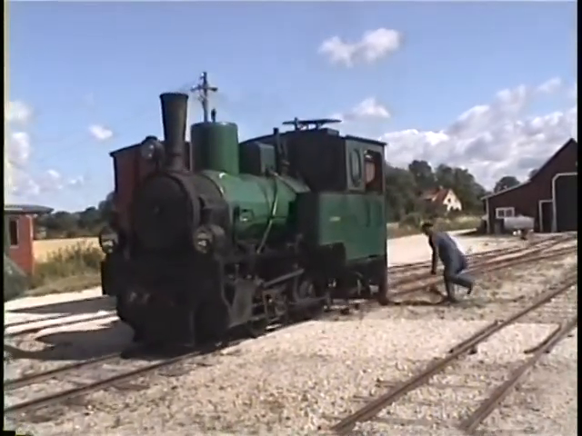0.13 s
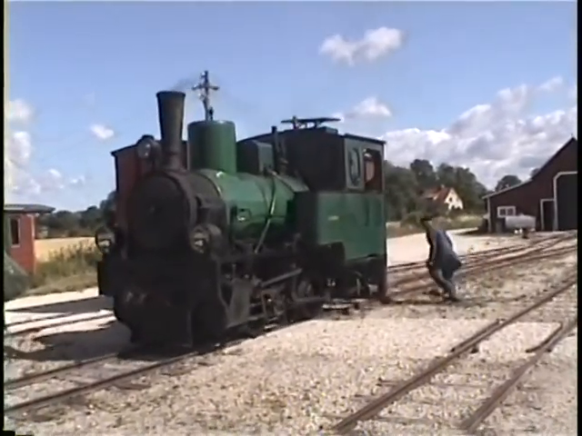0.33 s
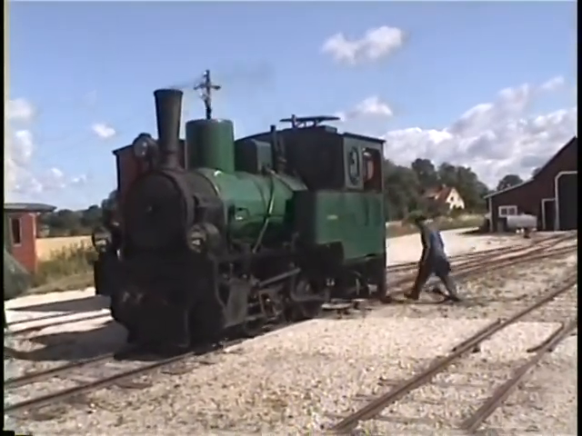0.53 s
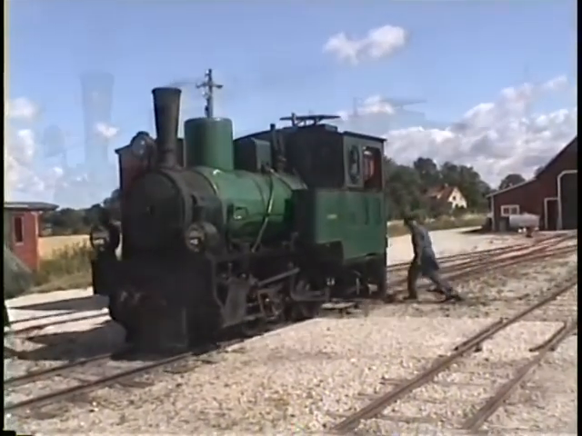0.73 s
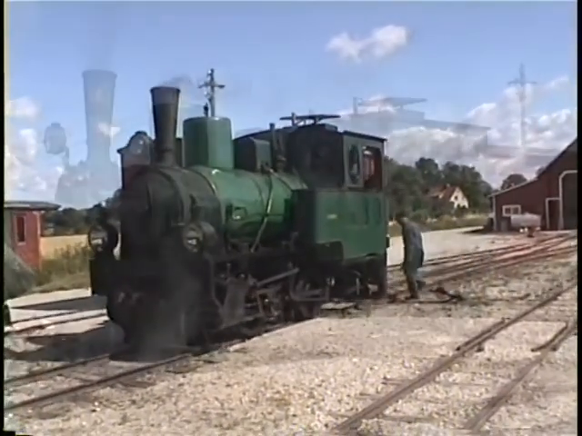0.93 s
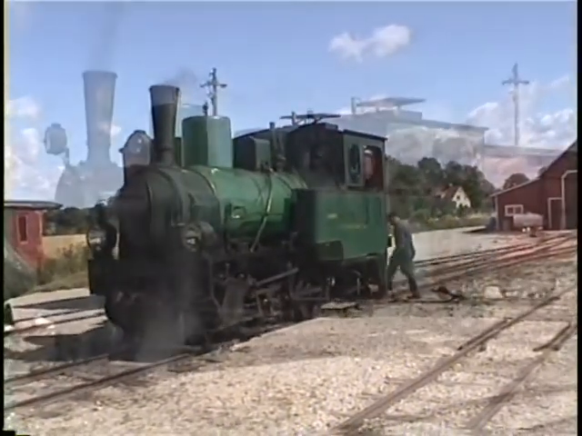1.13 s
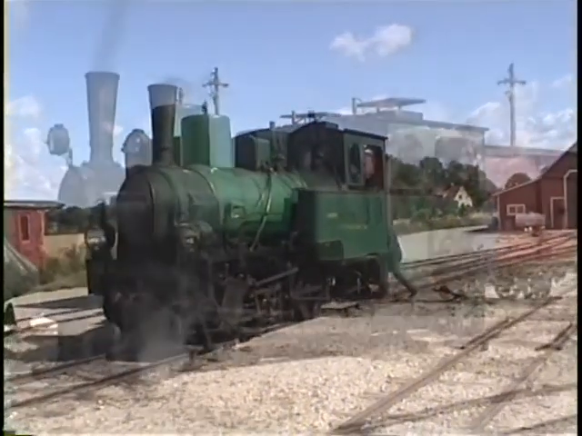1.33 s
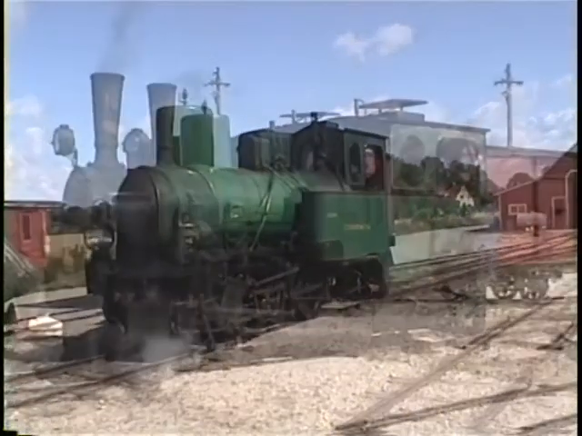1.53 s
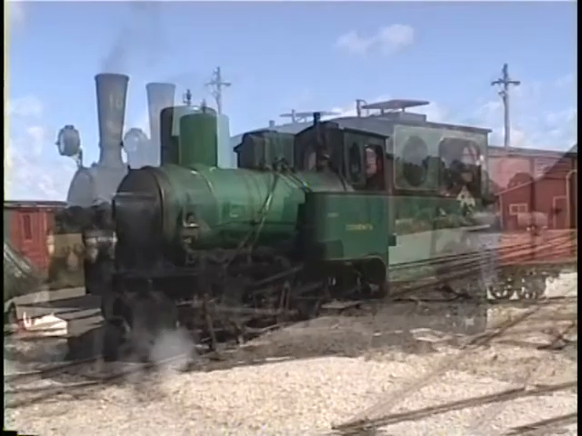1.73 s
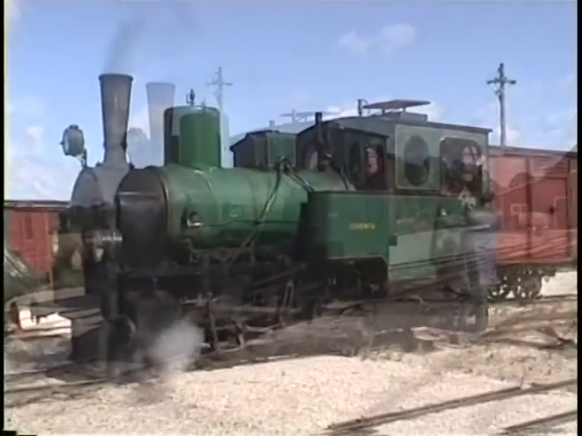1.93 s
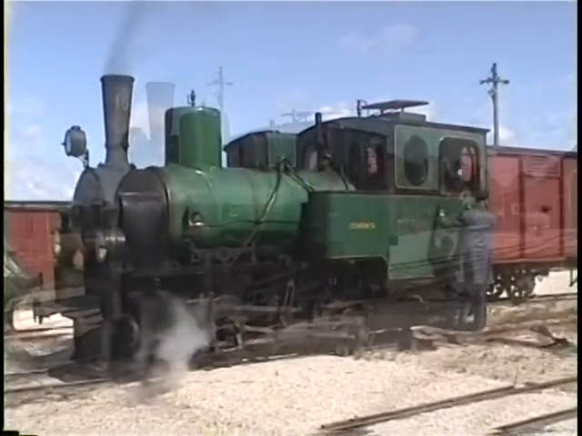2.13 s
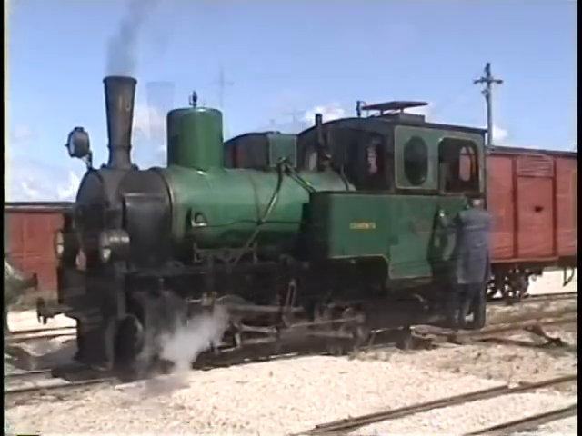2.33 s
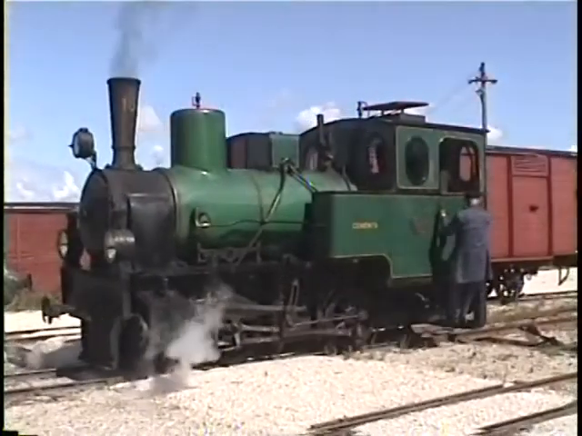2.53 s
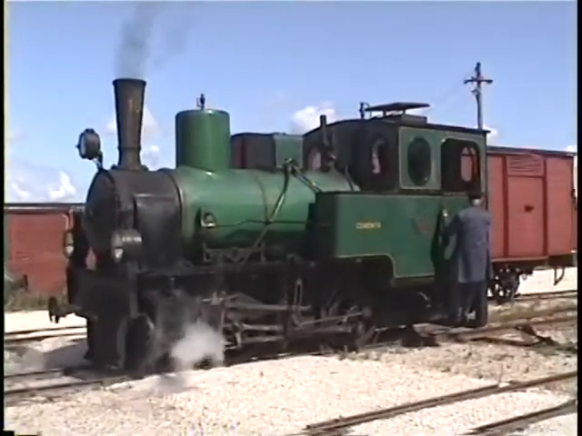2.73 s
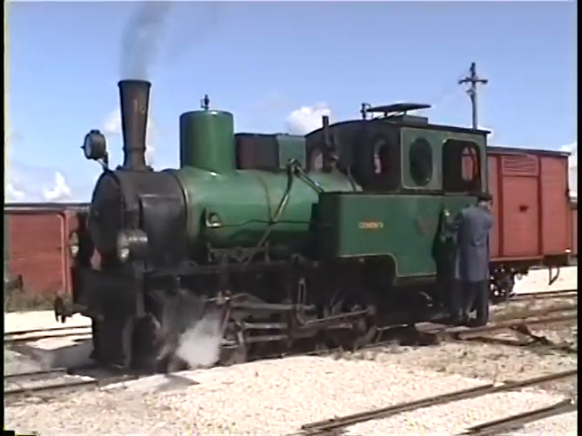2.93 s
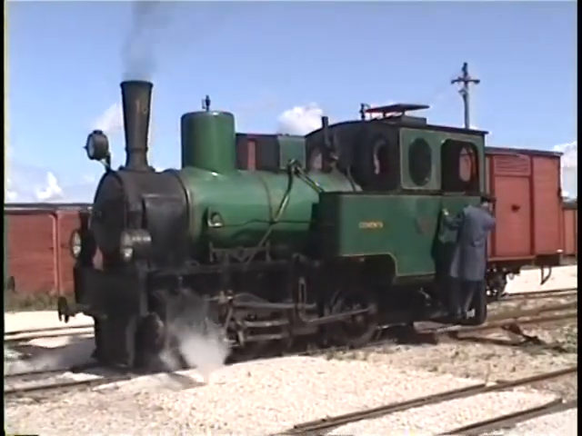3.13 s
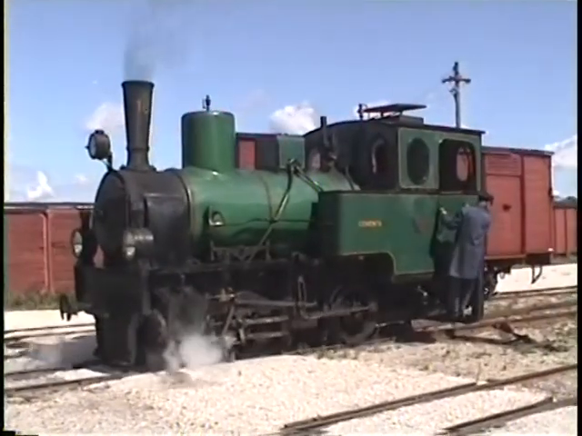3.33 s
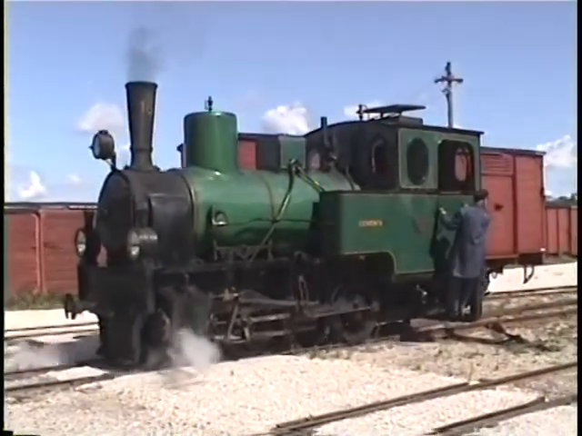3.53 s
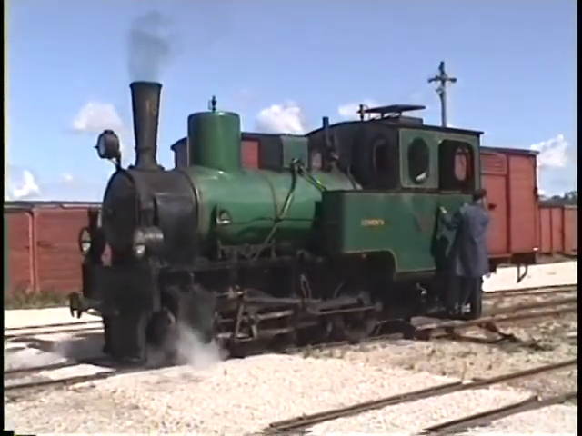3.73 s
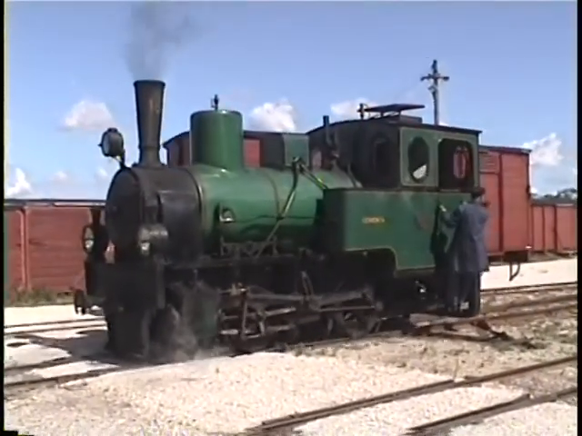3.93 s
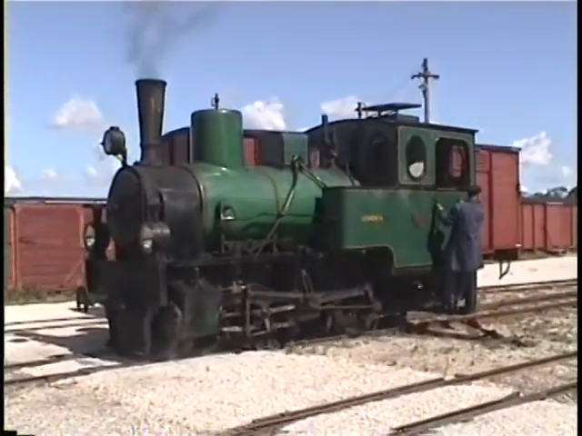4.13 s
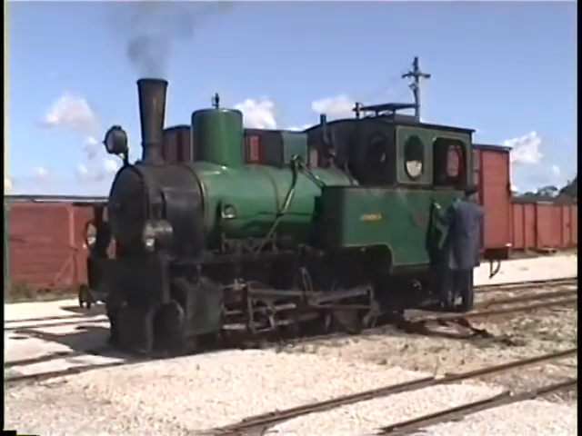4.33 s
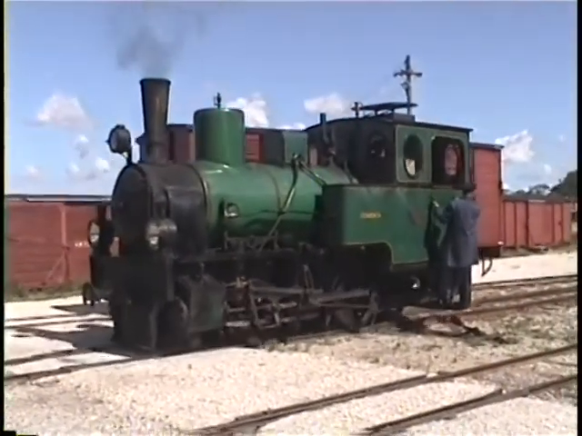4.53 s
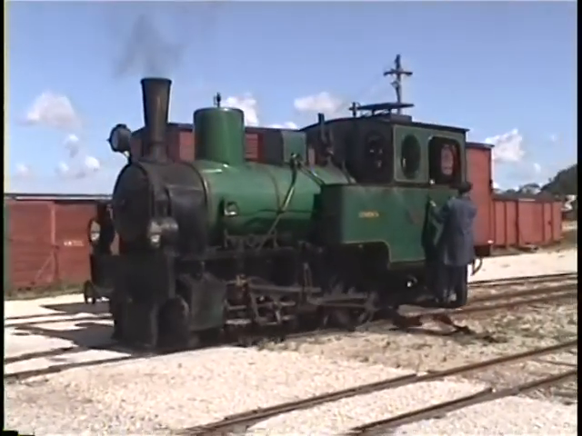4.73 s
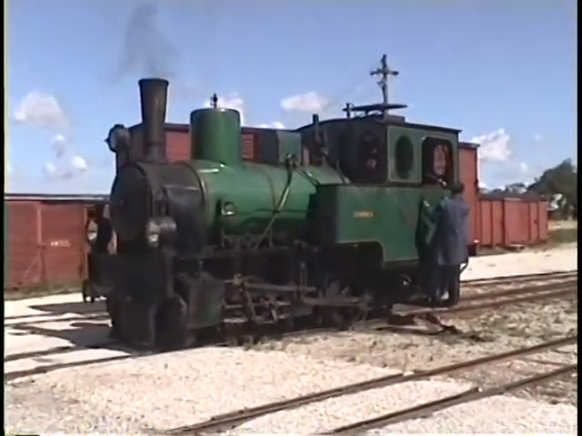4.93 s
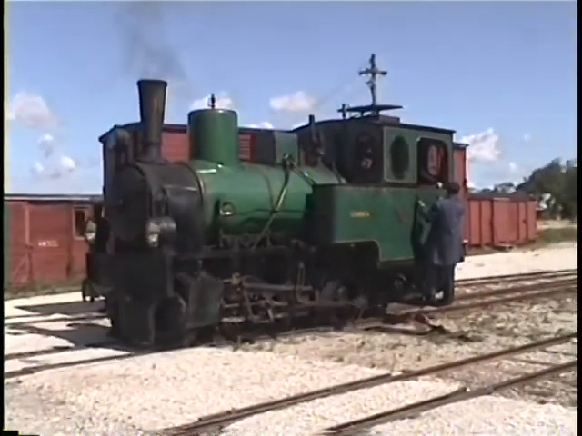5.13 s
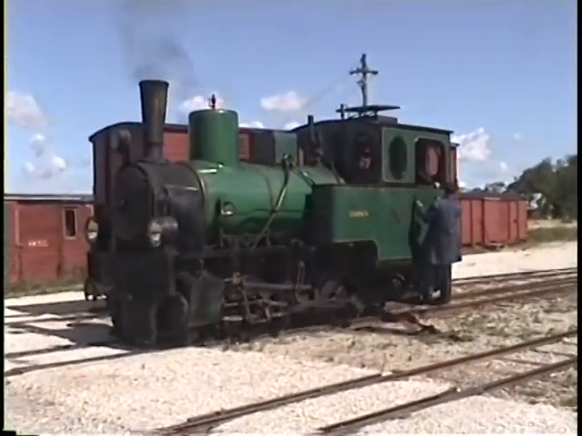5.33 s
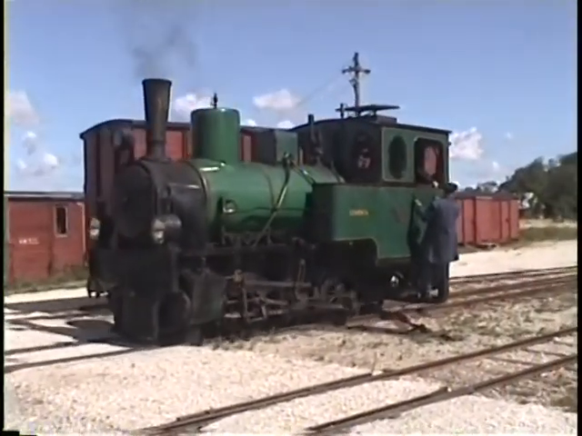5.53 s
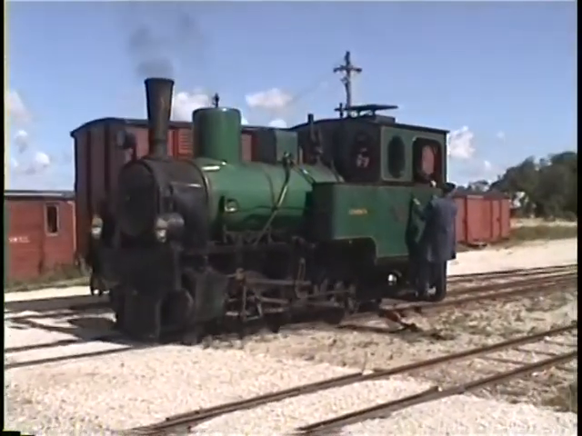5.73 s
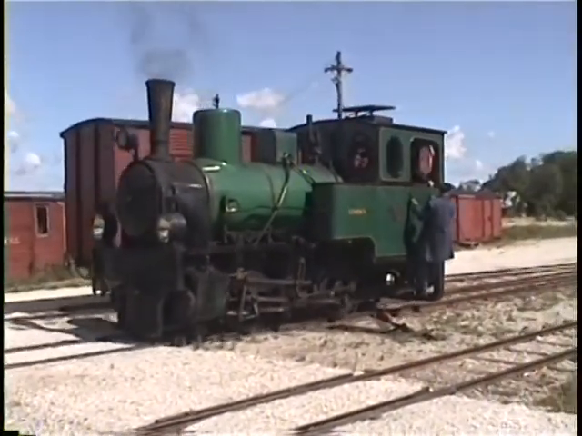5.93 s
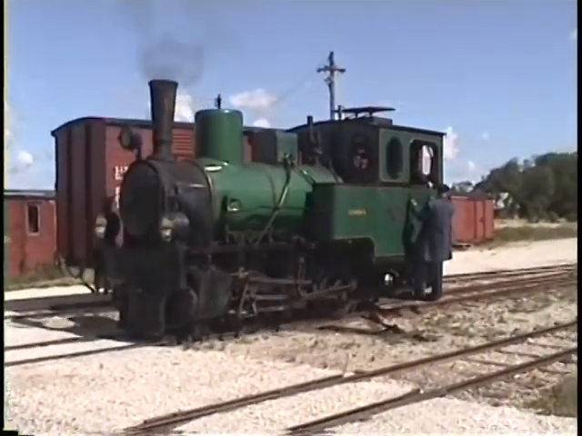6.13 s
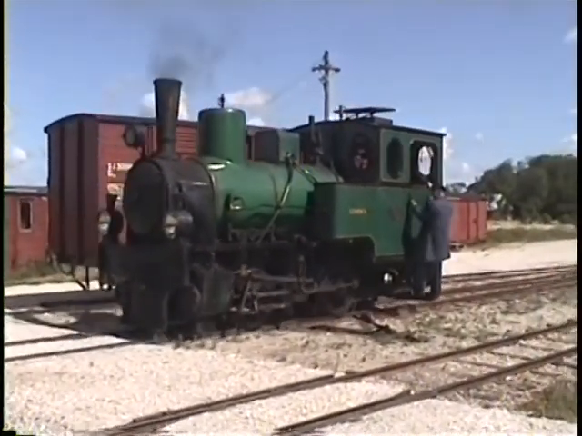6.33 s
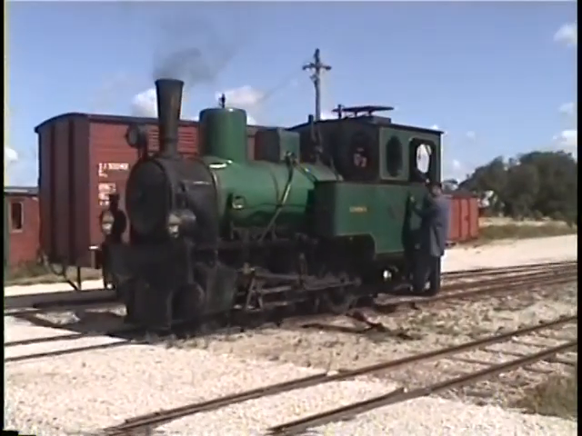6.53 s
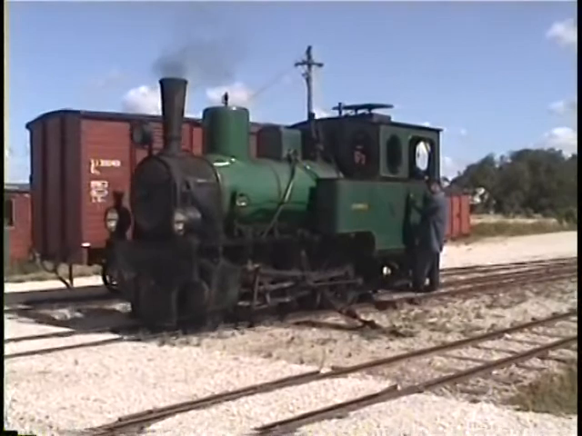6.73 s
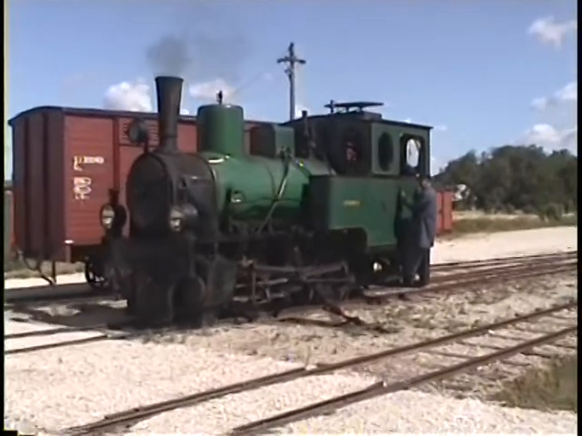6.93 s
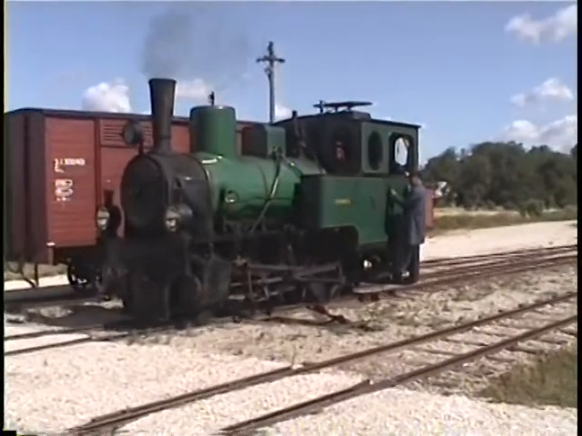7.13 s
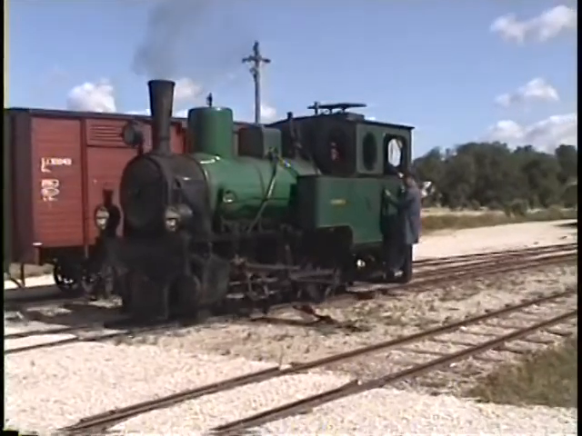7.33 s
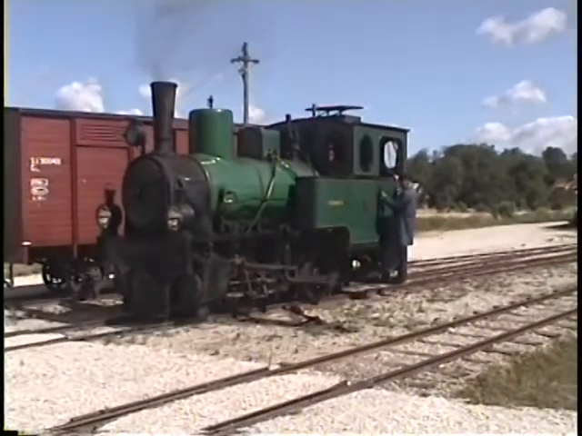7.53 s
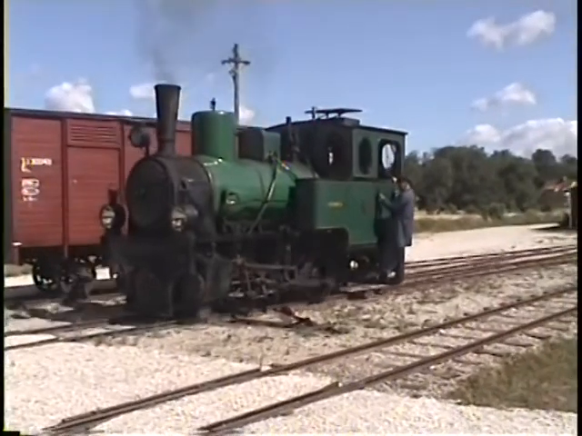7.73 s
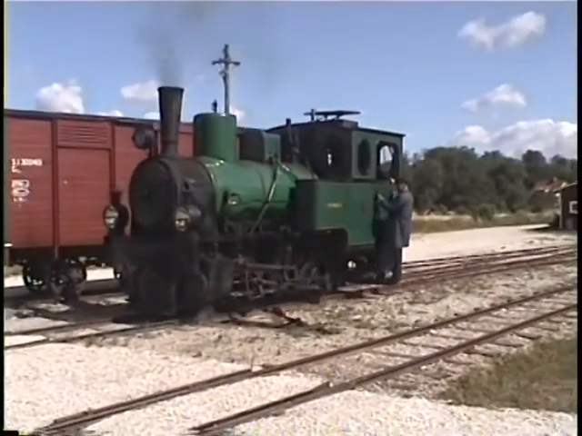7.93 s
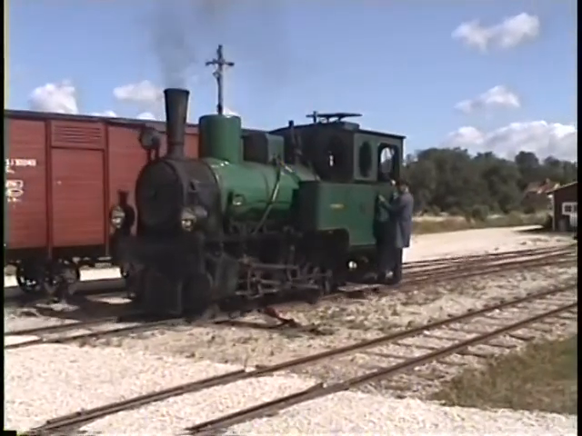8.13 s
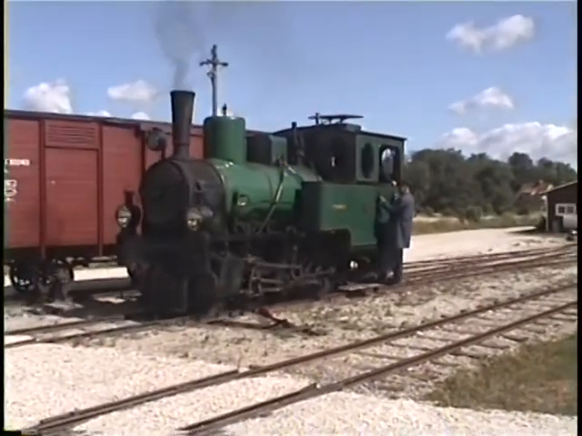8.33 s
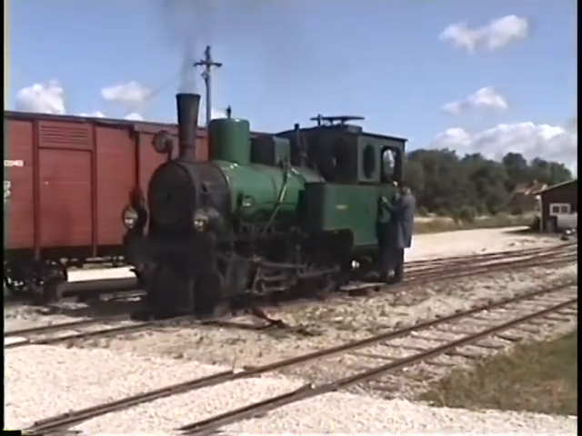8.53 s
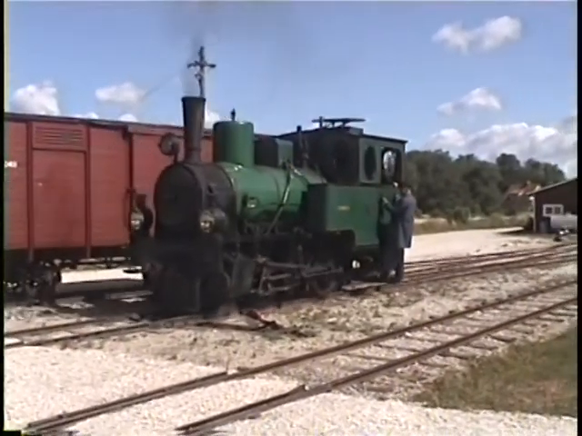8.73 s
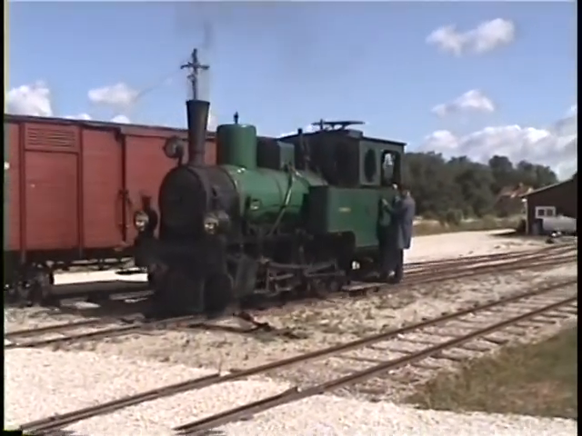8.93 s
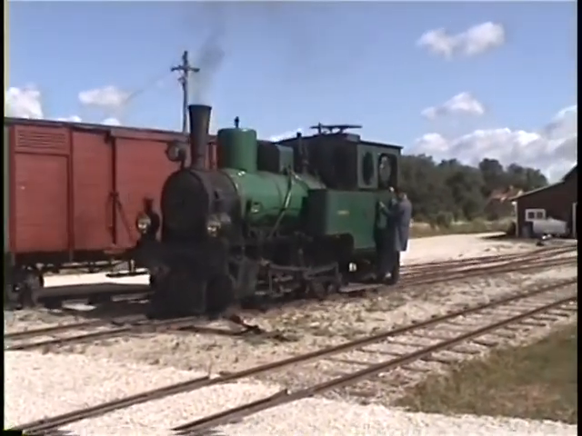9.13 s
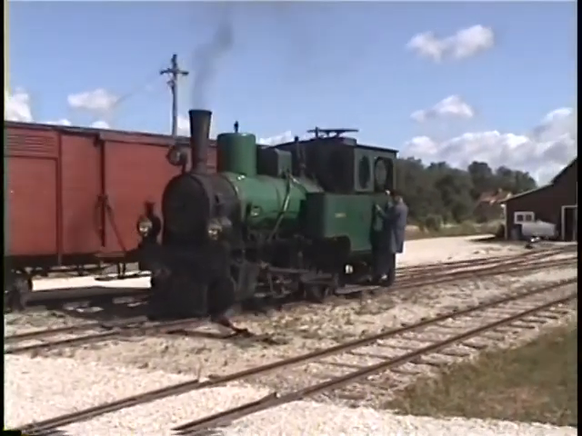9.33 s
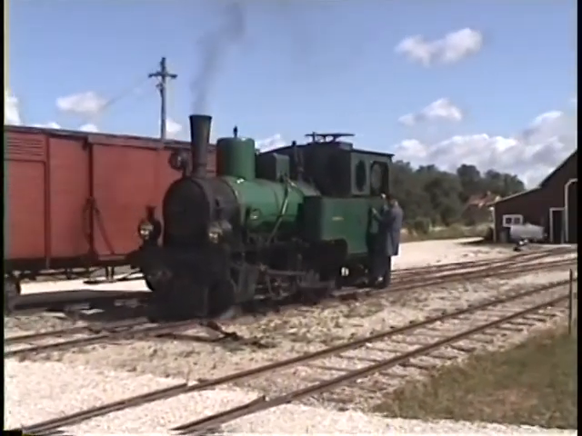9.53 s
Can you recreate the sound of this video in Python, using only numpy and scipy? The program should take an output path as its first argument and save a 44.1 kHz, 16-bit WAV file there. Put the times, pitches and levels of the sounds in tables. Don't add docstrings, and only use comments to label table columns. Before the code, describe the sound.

Open rail yard, one microphone with automatic gain, almost mono. At 0 s a bright, rather distant steam hiss over low rumble and soft knocks shuts off near 0.4 s, leaving two small wet spits. From about 0.6 s a second jet creeps in, swelling steadily and getting brighter, a full harsh roar by 2.5 s, until it stops abruptly at 3.65 s with a metallic clack and last puff. Quiet follows, with faint squeals; dry lever ticks at 4.45-4.7 s, the strongest at 4.6, then a short piercing brake squeak at 4.9 s. Heavy coupling clanks strike at 5.75-6.1 s as leaking hiss rises and wheels rumble. A lighter clank comes at 6.8 s, a sharp tick at 7.65 s, then irregular dull knocks from 7.8 to 9.3 s, chain chinks around 8.1-8.6 s, and a last rattle at 9.6 s over steady hiss.

```python
import sys
import numpy as np
from scipy import signal
from scipy.fft import rfft, irfft, next_fast_len
from scipy.io import wavfile
from scipy.ndimage import uniform_filter1d, minimum_filter1d

SR = 44100
rng = np.random.default_rng(int(sys.argv[2]) if len(sys.argv) > 2 else 0)


def log_audio(samples):
    frames = np.atleast_2d(samples).T
    limited = np.clip(frames, -1, 1)
    pcm = np.round(limited * 32767).astype(np.int16)
    wavfile.write(sys.argv[1], SR, pcm)


def voltage_ratio(decibels):
    exponent = np.asarray(decibels, float) / 20
    return 10 ** exponent


N = 427769


def unit(x):
    return x / np.sqrt(np.mean(x ** 2) + 1e-20)


def noise():
    return rng.standard_normal(N)


def along(points, hz):
    f, v = np.transpose(points)
    return np.interp(np.log(hz + 1), np.log(f + 1), v)


def curves(rows, outside=None):
    s, *columns = np.transpose(rows)
    return [np.interp(np.arange(N) / SR, s, c, outside, outside) for c in columns]


def wobble(rate):
    count = int(N * rate / SR) + 4
    fine = signal.resample(rng.standard_normal(count), 8 * count)
    return np.interp(np.arange(N) * rate / SR, np.arange(len(fine)) / 8, fine)


def filtered(x, response):
    m = next_fast_len(N + 8192)
    return irfft(rfft(x, m) * response(np.fft.rfftfreq(m, 1 / SR)), m)[:N]


def coloured(spectrum):
    return lambda hz: voltage_ratio(along(spectrum, hz))


def lifted(spectrum, pipe):
    def response(f):
        peaks = sum(db / (1 + (2 * (f - centre) / width) ** 2) for centre, width, db in pipe)
        return voltage_ratio(along(spectrum, f) + peaks)
    return response


def modes(rows):
    def response(f):
        h = 0
        for k, (centre, width, db) in enumerate(rows):
            damping = 1j * f * width
            h = h + (-1) ** k * voltage_ratio(db) * damping / (centre * centre - f * f + damping)
        return h / np.sqrt(np.mean(abs(h) ** 2))
    return response


def rush(response, patchy_db):
    z = signal.stft(noise(), nperseg=512)[2]
    field = uniform_filter1d(uniform_filter1d(rng.standard_normal(z.shape), 6, 0), 12, 1)
    patchy = signal.istft(z * voltage_ratio(patchy_db * unit(field)), nperseg=512)[1][:N]
    return unit(filtered(patchy, response))


def bursts(times, levels_db, lengths, lag, rise, after):
    out, t = np.zeros(N + SR), np.arange(SR // 4) / SR
    for s, db, length in zip(times, levels_db, lengths):
        fall = voltage_ratio(-60 * np.clip(t - length, 0, None) / after)
        shape = (1 - np.exp(-t / rise)) * np.exp(-t / length) * fall
        out[round((s + lag) * SR):][:len(t)] += voltage_ratio(db) * shape
    return out[:N]


def blows(times, levels_db, soft):
    out, push = np.zeros(N), np.hanning(round(soft * SR) + 2)
    out[np.round(times * SR).astype(int)] = voltage_ratio(levels_db)
    return signal.fftconvolve(out, push / np.linalg.norm(push))[:N]


# frequency in Hz, density in dB per Hz.
FAR_JET = [(710, -53), (1200, -27), (2590, -7), (3770, -18.5), (4200, -24), (5040, -20), (7650, -22),
           (8700, -6.5), (9780, -5), (11600, -10.5), (15500, -43)]


def far_vent():
    level_db, loudest_s, swell_db = -36, 0.22, 3.8
    shut_s, fall_db_per_s = 0.375, 650
    t = np.arange(N) / SR
    swell = swell_db * (1 - abs(t / loudest_s - 1))
    course_db = level_db + swell - fall_db_per_s * np.clip(t - shut_s, 0, 1)
    return voltage_ratio(course_db + 1.9 * wobble(43.4)) * rush(coloured(FAR_JET), patchy_db=1.8)


# time in seconds, level in dB.
LEAK = [(.37, -51), (.42, -62.5), (.6, -62), (.72, -58.5), (3.6, -59), (3.7, -51), (4.2, -55.5),
        (5.45, -45.5), (6.39, -42), (7.04, -42.5), (7.66, -41), (9.25, -43), (9.53, -40), (9.7, -40.5)]
# frequency in Hz, density in dB per Hz.
LEAK_AIR = [(530, -3.5), (900, -6), (1580, -4.5), (1800, -7.5), (3710, -8), (4390, -2.5), (6120, -8),
            (7410, -8), (10300, -4.5), (14100, -16), (15500, -57)]
# frequency in Hz, width in Hz, lift in dB.
LEAK_PIPE = [(4530, 240, 4.5), (4650, 110, -0.5), (5570, 200, 2), (6620, 190, 6), (7140, 130, 8),
             (7620, 390, 8), (8960, 750, 6), (10550, 110, 7.5)]


def leak():
    return voltage_ratio(curves(LEAK)[0] + 0.34 * wobble(9.1)) * rush(lifted(LEAK_AIR, LEAK_PIPE), patchy_db=1.45)


# time in seconds, level in dB.
VENT = [(.58, -71), (.66, -53.5), (.81, -43.5), (1.06, -37.5), (1.55, -30.5), (2.12, -19), (2.78, -13.5),
        (3.63, -15.5), (3.67, -53)]


def vent():
    pressure_from, pressure_to, bend = 0.1, 0.64, 2.1
    u = np.clip((np.arange(N) / SR - VENT[0][0]) / (VENT[-1][0] - VENT[0][0]), 0, 1)
    pressure = np.clip(pressure_from + (pressure_to - pressure_from) * u ** bend, 0, 1)
    return curves(VENT, -120)[0], pressure


# time in seconds, level in dB.
ROLL = [(0, -37.5), (.24, -41), (.38, -49.5), (.68, -49), (1.5, -60), (3.6, -52), (3.7, -44.5),
        (3.9, -50.5), (4.1, -58), (4.9, -49), (5.79, -47.5), (6.01, -41.5), (6.41, -48.5), (6.6, -49),
        (7.7, -42.5), (8.33, -37), (8.65, -34), (8.93, -39), (9.7, -40)]
# frequency in Hz, density in dB per Hz.
ROLLING = [(35, -14), (60, -3.5), (135, -1), (190, -1), (231, -4), (348, -7), (399, -15), (637, -5),
           (976, -13.5), (1600, -17), (2080, -38), (3520, -120)]


def rolling():
    jet_rumble_db = vent()[0] - 26
    level = np.hypot(voltage_ratio(curves(ROLL)[0]), voltage_ratio(jet_rumble_db))
    return level * voltage_ratio(0.81 * wobble(16)) * rush(coloured(ROLLING), patchy_db=2.5)


def following(level_db, steam, roll):
    return level_db + steam * (curves(LEAK)[0] + 45) + roll * (curves(ROLL)[0] + 45)


# frequency in Hz, width in Hz, level in dB.
WHISTLE = [(1764, 190, 1.5), (1922, 57, 3), (2050, 45, 2.5), (2225, 33, 1.5)]


def whistle():
    level_db = following(-50.5, steam=0.63, roll=0.25) + 1.5 * wobble(3.06)
    return voltage_ratio(level_db - 1) * rush(lambda f: modes(WHISTLE)(f) ** 2, patchy_db=2.5)


# frequency in Hz, width in Hz, level in dB.
DRAUGHT = [(2260, 180, 3), (2910, 810, 2)]


def draught():
    level_db = following(-54, steam=0.23, roll=0.73) + wobble(2.65)
    idle_db = -64.5
    level = np.hypot(voltage_ratio(level_db - 1.5), voltage_ratio(idle_db))
    return level * rush(lambda f: modes(DRAUGHT)(f) ** 2, patchy_db=3.0)


# frequency in Hz, density in dB per Hz.
GUST = [(7.1, -38), (12, -15), (38, 15), (65, 3), (150, -21), (200, -36), (330, -120)]


def wind():
    wind_db, gusty_db = -58.5, 2.5
    jet_buffet_db = vent()[0] - 28
    level = np.hypot(voltage_ratio(wind_db), voltage_ratio(jet_buffet_db)) * voltage_ratio(gusty_db * wobble(5))
    return level * unit(filtered(noise(), coloured(GUST)))


def standing():
    start, stop, dip_db = 3.655, 3.686, -17
    hush_db = curves([(start - 0.03, 0), (start, dip_db), (stop, dip_db), (stop + 0.0096, 0)])[0]
    return voltage_ratio(hush_db) * (leak() + whistle() + draught() + rolling() + wind())


# start in seconds, frame level in dB, hardness in dB, length in seconds.
KNOCKS = [(0.084, -28, 1.5, 0.0342), (0.137, -30, -1, 0.0316), (0.38, -31.5, -4, 0.019),
          (.617, -32.5, -10, .017), (0.825, -35, -8, .016), (0.983, -44, -20, .015),
          (1.726, -32.5, -10, 0.014), (1.999, -32.5, -8, 0.013), (3.613, -33, 22.5, 0.015),
          (4.797, -47.5, 8, .022), (4.857, -41, 2, .067)]
# start in seconds, frame level in dB, hardness in dB, length in seconds.
JOLTS = [(5.748, -16, 8.5, .015), (5.831, -11.5, 10.5, 0.012), (5.944, -15, -6, 0.014),
         (6.01, -21, -16, 0.038), (6.071, -25, -14, 0.032), (6.096, -35, -8, 0.02), (6.75, -40.5, 4, 0.047),
         (6.801, -26, 3.5, 0.0295), (7.42, -39.5, -26, 0.052), (7.603, -49, 18, 0.015),
         (7.809, -24, -14, 0.039), (7.912, -34.5, -16, .025), (8.025, -22, -7, 0.032),
         (8.145, -19, -4, 0.035), (8.242, -20.5, 1, .032), (8.34, -16, 1.5, 0.033),
         (8.459, -20.5, 1.5, 0.03), (8.614, -19.5, -6, 0.019), (8.663, -22, -2, 0.045),
         (8.818, -21, 16.5, .026), (8.934, -23, -1, 0.041), (9.145, -21, 0.5, 0.027),
         (9.259, -30.5, 6.5, 0.014), (9.583, -33, 4, .02), (9.596, -23.5, 14.5, 0.029),
         (9.656, -30, -10, .025)]
# start in seconds, level in dB, length in seconds.
SHUT = [
    (3.682, -35, 0.023),
    (3.72, -41, 0.076),
]
# time in seconds, level in dB.
POUNDING = [
    (6.9, -13),
    (7.4, -2),
    (8.45, -4),
    (8.7, -7.5),
]
# frequency in Hz, width in Hz, level in dB.
FRAME = [(216.5, 21, 1.5), (275.3, 53, 5), (338, 46, 1.5), (390, 72, -0.5)]
# frequency in Hz, width in Hz, level in dB.
TRACK = [(141, 40, -1), (202, 26, 1.5)]
# frequency in Hz, width in Hz, level in dB.
CLACK = [(559, 88, -4), (664, 121, 0), (767, 223, -3)]
# frequency in Hz, width in Hz, level in dB.
RATTLE = [(1384, 410, 1), (2260, 820, -5.5)]
# frequency in Hz, density in dB per Hz.
CRACK = [(1500, 3), (2600, 8), (5000, 1), (10000, -1), (13500, -17), (15000, -50)]


def sharp(f):
    return unit(coloured(CRACK)(f))


def knocks():
    s, db, hard_db, length = np.transpose(KNOCKS + JOLTS)
    length = np.clip(length, 0.004, 0.1)
    late = s + 0.1214 * length
    clack_db = db - 5 + 0.31 * hard_db
    rattle_db = db - 6 + 0.55 * hard_db
    crack_db = db - 11.5 + 0.95 * hard_db
    rattle_db[:len(KNOCKS)] += 5
    clack_db += -0.19 * (np.interp(s, *np.transpose(POUNDING)) - POUNDING[0][1])
    low, mid, high, top = unit(rng.standard_normal((4, N)) * voltage_ratio(2.0 * wobble(500)))
    shut = bursts(*np.transpose(SHUT), lag=0, rise=0.0034, after=0.43)
    shudder = bursts(s, db - 16.5, 3 * length, lag=0.0094, rise=0.026, after=0.27)

    push = (bursts(s, db - 1.5, length, lag=0.0042, rise=0.0054, after=0.042) + shudder) * low
    push += blows(s + 0.009, db + 10, soft=0.0015)
    frame = filtered(push, modes(FRAME)) + voltage_ratio(curves(POUNDING)[0]) * filtered(push, modes(TRACK))

    strike = blows(late + 0.001, clack_db + 13, soft=0.0005)
    jostle = bursts(late, clack_db + 3.0, 1.05 * length, lag=0, rise=0.0023, after=0.047)
    clatter = voltage_ratio(-9.5) * shudder
    clack = filtered((jostle + shut + clatter) * mid + strike, modes(CLACK))

    shaking = bursts(late, rattle_db - 0.5, 0.95 * length, lag=0, rise=0.0058, after=0.05)
    rattle = filtered((shaking + 0.42 * shut) * high, modes(RATTLE))
    crack = bursts(late, crack_db, 0.7 * length, lag=0.0022, rise=0.0019, after=0.041) * top
    return frame + clack + rattle + filtered(crack, sharp)


# start in seconds, peak in dB, length in seconds.
SPITS = [
    (0.451, -36, 0.018),
    (0.517, -34, 0.0074),
    (3.7095, -36.5, 0.012),
]
# frequency in Hz, density in dB per Hz.
SPIT_AIR = [(880, -31), (1500, -7), (2750, 0), (3890, -21), (7420, -17), (8330, -9), (12900, -10),
            (15000, -43)]


def spits():
    s, db, length = np.transpose(SPITS)
    puffs = bursts(s, db, length, lag=0, rise=0.0036, after=0.078)
    return puffs * unit(filtered(noise(), coloured(SPIT_AIR)))


# start in seconds, level in dB, first frequency in Hz, last frequency in Hz, length in seconds.
SQUEALS = [
    (.5, -59.5, 2180, 2140, 0.13),
    (.52, -64, 5400, 5400, 0.1),
    (4.006, -59, 1830, 2026, 0.72),
    (4.62, -54, 1950, 1980, 0.1),
    (5.278, -50, 2860, 2860, 0.24),
    (5.43, -51, 3000, 3120, 0.21),
    (6.442, -46.5, 1690, 1844, 0.276),
    (6.3, -50, 1806, 1770, 0.082),
    (7.102, -52, 2050, 2070, 0.41),
    (9.35, -51, 1890, 1890, 0.15),
]


def squeals():
    out, waver, grip = np.zeros(N), wobble(70), wobble(50)
    for s, db, from_hz, to_hz, length in SQUEALS:
        first = round(s * SR)
        span = slice(first, first + round(length * SR))
        u = np.linspace(0, 1, span.stop - span.start)
        pitch = (from_hz + (to_hz - from_hz) * u) * (1 + 0.015 * waver[span])
        level = np.sqrt(np.sin(np.pi * u) + 1e-9) * voltage_ratio(db + 4.6 * grip[span])
        out[span] += level * np.sin(2 * np.pi * np.cumsum(pitch) / SR)
    return out


def nozzle(x, pressure, width_hz):
    hz, t, z = signal.stft(x, SR, nperseg=512)
    share = np.interp(t, np.arange(N) / SR, pressure)
    peak_hz, peak_db = 7900 + 6000 * share, 3 + 5 * share
    lift_db = peak_db * np.exp(-((hz[:, None] - peak_hz) / width_hz) ** 2)
    return unit(signal.istft(z * voltage_ratio(lift_db), nperseg=512)[1][:N])


# frequency in Hz, density in dB per Hz.
WEAK_JET = [(240, -18.5), (400, -15.5), (503, -18.5), (596, -20.5), (643, -20), (797, -18.5), (1850, -19.5),
            (3160, -10), (4370, -10.5), (6600, -10), (8970, -4.5), (11800, -8.5), (15600, -44)]
# frequency in Hz, density in dB per Hz.
FULL_JET = [(240, -46), (400, -19), (459, -10.5), (1910, -15.5), (2630, -5.5), (3210, -3.5), (4170, -18.5),
            (9110, 3.5), (9830, -5.5), (10900, -0.5), (11600, -2), (12800, -7), (15600, -11)]
# frequency in Hz, width in Hz, lift in dB.
COCK_PIPE = [(2860, 550, 2.5), (3215, 110, 4.5), (3640, 92, 2.5), (5400, 450, 2.5), (6210, 130, 3.5),
             (7400, 69, -2.5), (14300, 600, 6)]


def near_vent():
    level_db, pressure = vent()
    weak = np.sqrt(1 - pressure) * rush(lifted(WEAK_JET, COCK_PIPE), patchy_db=1.5)
    full = np.sqrt(pressure) * rush(lifted(FULL_JET, COCK_PIPE), patchy_db=0.6)
    flutter_db = 0.5 * wobble(8.5) + 0.72 * wobble(60)
    return voltage_ratio(level_db + flutter_db) * nozzle(weak + full, pressure, width_hz=750)


# start in seconds, peak in dB, frequency in Hz, click in dB under the peak.
TICKS = [(4.057, -43, 993, -10), (4.449, -38.5, 980, -14), (4.547, -31, 1020, -14), (4.574, -33, 650, -14),
         (4.59, -13, 870, -17.5), (4.634, -21, 810, -11.5), (4.682, -23, 810, -16), (7.636, -25, 900, -16),
         (7.645, -10, 885, -12), (7.654, -28, 837, -6), (7.66, -20, 848, -10)]


def ticks():
    out, clicks, t = np.zeros(N + SR), np.zeros(N + SR), np.arange(SR // 20) / SR
    for s, db, hz, click_db in TICKS:
        at = round(s * SR)
        level = 3.54 * voltage_ratio(db - 60 * t / 0.0064) * (1 - np.exp(-t / 0.00074))
        out[at:][:len(t)] += level * np.sin(2 * np.pi * hz * t)
        clicks[at:][:len(t)] += voltage_ratio(db + click_db - 60 * t / 0.012) * rng.standard_normal(len(t))
    return out[:N] + filtered(clicks[:N], sharp)


# start in seconds, level in dB, length in seconds.
SQUEAK = [
    (4.889, 3.5, 0.011),
    (4.94, -27, 0.021),
]
# frequency in Hz, level in dB.
SQUEAK_TONES = [(2300, 0), (2400, -6), (4605, -7), (4740, -7), (6950, -15), (7100, -18), (9400, -15),
                (11600, -23)]


def squeak():
    level = bursts(*np.transpose(SQUEAK), lag=0, rise=0.03, after=0.15)
    at = np.arange(round(4.88 * SR), round(5.1 * SR))
    out, now = np.zeros(N), level[at]
    for hz, db in SQUEAK_TONES:
        rough = unit(uniform_filter1d(rng.standard_normal(len(at)), size=60))
        shake = hz / 18000 * rough
        phase = 2 * np.pi * hz * (at / SR - 4.8995)
        fade = (now / level.max()) ** (hz / 14000)
        out[at] += now * fade * voltage_ratio(db) * (1 + shake) * np.sin(phase)
    return out


# start in seconds, peak in dB, frequency in Hz, overtone in dB under the peak.
CHINKS = [
    (6.33, -35, 1550, -19),
    (8.113, -29, 1600, -9),
    (8.427, -22.5, 1625, -16),
    (8.54, -25, 1535, -7),
    (8.5894, -35, 1680, -5),
]


def chinks():
    out, t = np.zeros(N + SR), np.arange(SR // 20) / SR
    for s, db, hz, over_db in CHINKS:
        ring = np.sin(2 * np.pi * hz * t) + voltage_ratio(over_db) * np.sin(2 * np.pi * 2950 * t)
        level = 1.76 * voltage_ratio(db - 60 * t / 0.035) * (1 - np.exp(-t / 0.0013))
        rough = 1 + 0.27 * uniform_filter1d(rng.standard_normal(len(t)), size=30) * 5
        out[round(s * SR):][:len(t)] += level * ring * rough
    return out[:N]


# frequency in Hz, time to fall 60 dB in seconds.
YARD = [(100, 0.74), (500, 0.38), (2000, 0.16), (10000, 0.09)]


def yard(x):
    out, step = np.zeros(N + SR), SR // 4
    for start in range(0, N, step):
        hz, t, z = signal.stft(rng.standard_normal(SR // 2), SR, nperseg=256)
        decay = voltage_ratio(-60 * t / along(YARD, hz)[:, None])
        tail = signal.istft(z * decay, SR, nperseg=256)[1][:SR // 2]
        wet = signal.fftconvolve(x[start:start + step], tail / np.linalg.norm(tail))
        out[start + round(0.015 * SR):][:len(wet)] += wet
    return out[:N]


def scene():
    heavy, light = knocks(), ticks() + squeak() + chinks() + squeals()
    steam = far_vent() + spits() + near_vent()
    echo = yard(voltage_ratio(-16.0) * heavy + voltage_ratio(-23.0) * light)
    mono = heavy + light + echo + steam + standing()
    return np.array([mono, mono])


def stray(x):
    hz, t, z = signal.stft(x, SR, nperseg=2048)
    band = (np.log(hz + 300) * 14).astype(int)
    chance = np.interp(hz, [0, 8000, 8500, 14500, 15500], [0.0004, 0.008, 0.05, 0.07, 0.01])
    hit = rng.random((band.max() + 1, len(t)))[band] < chance[:, None]
    turned = np.exp(2j * np.pi * rng.random(z.shape))
    return voltage_ratio(-11) * signal.istft(z * hit * turned, nperseg=2048)[1][:N]


def band_limit(x):
    return signal.sosfilt(signal.butter(12, 15720, fs=SR, output="sos"), x)


def record(dry):
    heard = filtered(dry[0], lambda f: 0.27 + f / (f + 2500))
    need_db = -0.6 * np.clip(20 * np.log10(abs(heard) / 0.1 + 1e-9), 0, None)
    hold = round(0.042 * SR)
    held_db = minimum_filter1d(need_db, hold, origin=hold // 2 - 60)
    kept = dry * voltage_ratio(uniform_filter1d(held_db, round(0.019 * SR)))
    kept = kept / (1 + abs(kept / 0.27) ** 6) ** (1 / 6)
    kept = kept + stray(kept[0]) * np.array([[1], [-1]])
    return band_limit(kept)


dry = scene()
out = record(dry)
log_audio(out)
```